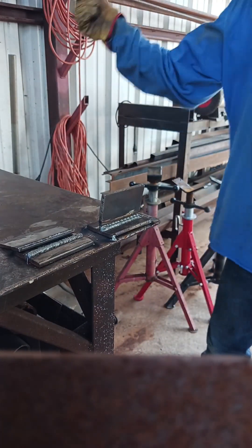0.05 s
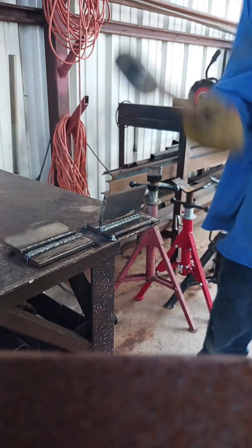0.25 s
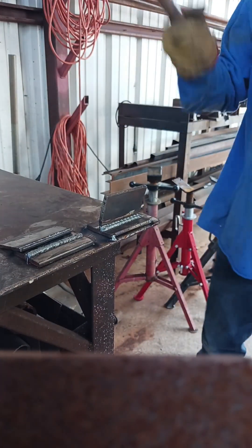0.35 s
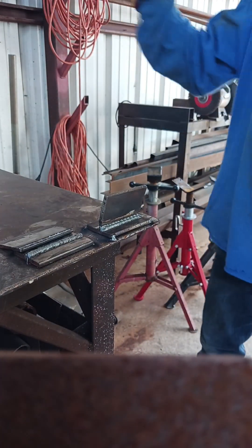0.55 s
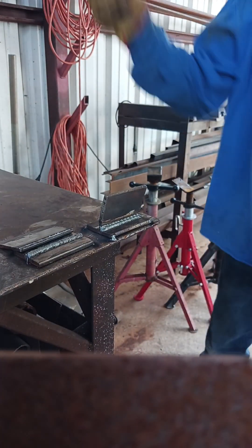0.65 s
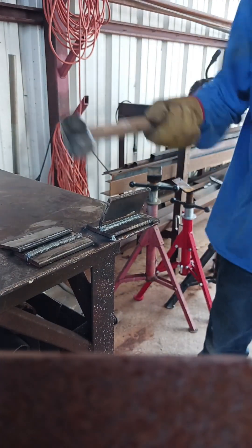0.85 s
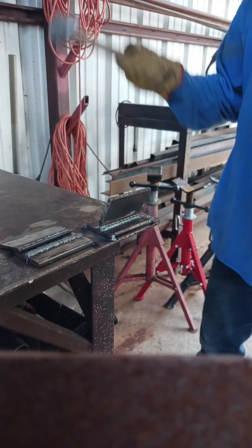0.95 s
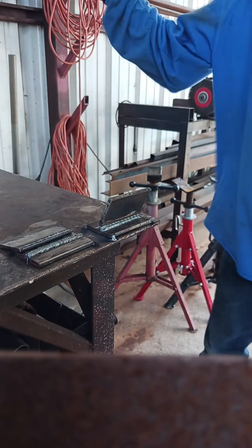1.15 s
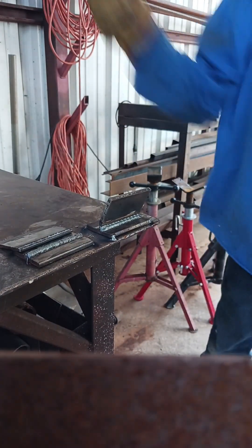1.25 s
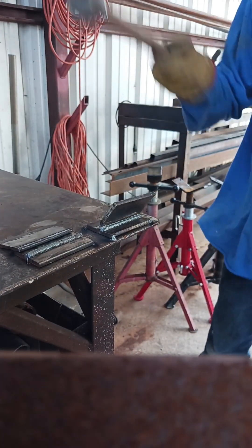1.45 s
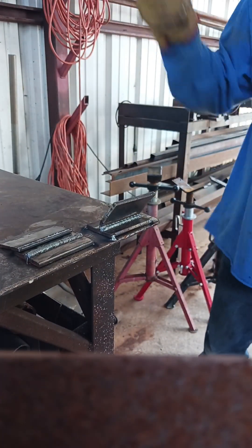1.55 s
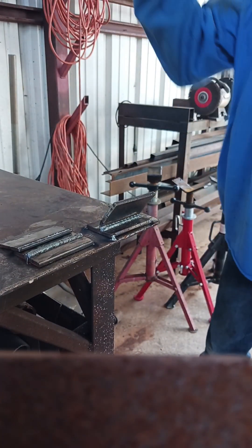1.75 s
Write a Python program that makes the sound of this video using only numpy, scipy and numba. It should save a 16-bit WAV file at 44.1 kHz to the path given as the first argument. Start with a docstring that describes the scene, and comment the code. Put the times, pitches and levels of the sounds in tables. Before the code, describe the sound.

Sledgehammer strikes a welded steel piece on a steel table, three loud cracking clangs in a metal shed

```python
"""In a sheet-metal shop a sledge strikes a welded steel coupon on a steel table, a metre or two from a phone.
Each blow is a crack shaped by broad plate resonances, with thin decaying rings and clatter; the shed is noise
that builds up and dies away. A loose steel bit, a few high decaying tones, chinks twice after one blow.
Filtered noise is the quiet shop air. The two microphone ports clip the loudest part and a limiter holds
the level down."""
import sys
import numpy as np
from scipy import signal
from scipy.fft import rfft, irfft, next_fast_len
from scipy.io import wavfile
from numba import njit

SR = 44100
rng = np.random.default_rng(int(sys.argv[2]) if len(sys.argv) > 2 else 0)


def gain_from_db(level_db):
    """Convert decibel levels to linear amplitude factors (20 dB per decade)."""
    decades = np.asarray(level_db, float) / 20
    return 10 ** decades


def inscribe(sig):
    """Save sig as 16-bit PCM at rate SR to the path in sys.argv[1].

    A 1-D sig is mono; a 2-D sig holds one channel per row.
    Samples are clipped to [-1, 1] before scaling.
    """
    pcm = np.round(np.clip(np.atleast_2d(sig).T, -1, 1) * 32767)
    wavfile.write(sys.argv[1], SR, pcm.astype(np.int16))


N = 79380  # length in samples: 1.8 s


def read_curve(table, hz):
    """Reads the second column of a table at any frequency, in straight lines over log frequency."""
    points = np.array(table)
    return np.interp(np.log(np.maximum(hz, 1)), np.log(points[:, 0]), points[:, 1])


# How alike the two ports hear the same noise. Each row: frequency in Hz, likeness from 0 to 1.
PORT_LIKENESS = [(60, 0.36), (130, 1), (300, 0.7), (640, 0.52), (1400, .02), (7000, 0.17), (15000, 0.67)]


def stereo_noise(size):
    """Spectra of left and right noise: a shared and an opposed part, mixed by how alike the ports are."""
    like = np.clip(read_curve(PORT_LIKENESS, np.fft.rfftfreq(size, 1 / SR)), 0, 1)
    shared, opposed = rfft(rng.standard_normal((2, size)))
    opposed = opposed * np.array([[1], [-1]])
    return (shared * np.sqrt(1 + like) + opposed * np.sqrt(1 - like)) / np.sqrt(2)


# Tone colour of the shop air. Each row: frequency in Hz, relative level in dB.
AIR_COLOUR = [(30, 3), (120, 10), (400, 11.5), (1400, -7), (4000, -19), (8000, -40.5), (16000, -59)]
AIR_DB = -74  # loudness ahead of the microphone


def shop_air():
    """Steady rumble and hiss: noise filtered so that it falls off towards the treble."""
    colour = gain_from_db(read_curve(AIR_COLOUR, np.fft.rfftfreq(N, 1 / SR)))
    air = irfft(stereo_noise(N) * colour, N)
    return air * gain_from_db(AIR_DB) / air.std()


# How long the shed rings on. Each row: frequency in Hz, time to fall by 60 dB in seconds.
SHED_T60 = [(60, 1.58), (200, .9), (600, 0.6884), (1500, 0.5719), (4000, 0.5453), (8000, 0.4739),
            (16000, 0.2625)]
SHED_SIZE, SHED_BUILD_S = 52000, 0.02  # length in samples, build-up time in seconds
DIRECT_DB, DIRECT_S = 1.5, 0.0049  # direct burst: level in the treble, decay time constant
DIRECT_FROM_HZ = 3000  # the direct burst is thin: the bass arrives by the walls


def shed():
    """Stereo response: a quick direct burst, then noise that builds up and dies away band by band."""
    t, hz = np.arange(SHED_SIZE) / SR, np.fft.rfftfreq(SHED_SIZE, 1 / SR)
    noise = stereo_noise(SHED_SIZE)
    response = 0
    octave = np.log2(np.maximum(hz, 1))
    for centre in np.arange(5, 14.5, .5):  # half-octave steps, as powers of two in Hz
        centre_hz = 2 ** centre
        band = np.cos(np.pi * np.clip(octave - centre, -.5, .5)) ** 2
        decay = np.exp(-np.log(1000) * t / read_curve(SHED_T60, centre_hz))
        build_up = 1 - np.exp(-t / SHED_BUILD_S)
        direct = gain_from_db(DIRECT_DB) * np.exp(-t / DIRECT_S) / (1 + (DIRECT_FROM_HZ / centre_hz) ** 2)
        response = response + irfft(noise * band, SHED_SIZE) * decay * (build_up + direct)
    return response


def ring(modes, scatter, since):
    """Struck metal: decaying sines of given Hz, dB and T60 in seconds, silent before the hit."""
    hz, db, t60 = (column[:, None] for column in np.array(modes).T)
    on = since[since >= 0]
    decay = np.exp(-np.log(1000) * on / t60)
    tone = gain_from_db(db + scatter[:, None]) * decay * np.sin(2 * np.pi * hz * on)
    return np.concatenate([np.zeros(len(since) - len(on)), tone.sum(axis=0)])


def pan(db):
    """Left and right gains for a sound that is louder on the left by this many dB."""
    return gain_from_db(np.array([[db], [-db]]) / 2)


# The loose bit lands. Each row: start in seconds, level in dB, brightness in dB per octave.
CHINKS = [(0.294, -24, -5), (0.335, -21, 0)]
# Tones of the bit, lowest first. Each row: level in dB, time to fall by 60 dB in seconds.
BIT_TONES = [(-2.5, 0.16), (-15, .2), (-6.5, 0.17), (-14.5, 0.22)]
# Pitches of those tones, in the same order, in Hz.
BIT_HZ = (8190, 9830, 12317, 14479)
BIT_SCATTER_DB = 3.5  # random spread of each tone
BIT_PAN_DB, BIT_ROOM_DB = 13.5, -12  # left over right; setting of its share through the shed


def loose_bit(room, size, lead):
    """A small steel piece bounces twice near the left port: a few high tones ring at each landing."""
    t = (np.arange(size) - lead) / SR
    scatter = BIT_SCATTER_DB * rng.standard_normal((len(CHINKS), len(BIT_TONES)))
    octaves = np.log2(np.array(BIT_HZ) / np.mean(BIT_HZ))
    modes = [(hz, *row) for hz, row in zip(BIT_HZ, BIT_TONES)]
    chinks = 0
    for (start, db, tilt_db), spread in zip(CHINKS, scatter):
        chinks = chinks + gain_from_db(db) * ring(modes, spread + tilt_db * octaves, t - start)
    in_shed = irfft(rfft(chinks) * room, size) / 20
    return chinks * pan(BIT_PAN_DB) + gain_from_db(BIT_ROOM_DB) * in_shed


def resonance(hz, centre_hz, width_hz):
    """Response of one broad plate resonance, 1 at the centre."""
    return 1j * hz * width_hz / (centre_hz ** 2 - hz ** 2 + 1j * hz * width_hz)


# Tone colour of the blow. Each row: frequency in Hz, level in dB.
BLOW_COLOUR = [(40, -40.5), (120, -30), (300, -28), (700, -15.5), (1500, -1.5), (4000, -2), (7000, -3),
               (9500, -14.5), (12500, -6), (16000, -15)]
TABLE_HZ, TABLE_WIDTH_HZ, FLANGE_HZ, FLANGE_WIDTH_HZ = 1450, 700, 2200, 400
COUPON_DB, COUPON_WIDTH_HZ, CRACK_DB = 2, 500, -7.5


def blow_body(hz, table_db, flange_db, coupon_hz, size):
    """Spectrum of crack, table, flange and coupon, their powers added, with the energy as early as can be."""
    table = gain_from_db(table_db) * resonance(hz, TABLE_HZ, TABLE_WIDTH_HZ)
    flange = gain_from_db(flange_db) * resonance(hz, FLANGE_HZ, FLANGE_WIDTH_HZ)
    coupon = gain_from_db(COUPON_DB) * resonance(hz, coupon_hz, COUPON_WIDTH_HZ)
    power = gain_from_db(CRACK_DB) ** 2 + abs(table) ** 2 + abs(flange) ** 2 + abs(coupon) ** 2
    log_gain = np.log(np.sqrt(power) * gain_from_db(read_curve(BLOW_COLOUR, hz)))
    cepstrum = irfft(log_gain, size)
    cepstrum[1:size // 2] *= 2  # folding the cepstrum gives minimum phase
    cepstrum[size // 2 + 1:] = 0
    return np.exp(rfft(cepstrum))


CLATTER_COUNT, CLATTER_S = 24, .07  # hits per blow, time they spread over in seconds
CLATTER_DB, CLATTER_SCATTER_DB = -18.5, 3  # least level (nearly) against the blow, spread above it


def blow_and_clatter(when, big, size):
    """Things on the table jump and clatter: weaker hits at random moments after the blow itself."""
    taps = np.zeros(size)
    hit_db = CLATTER_DB - CLATTER_SCATTER_DB * np.log(big + 0.00033) / 2
    taps[(when * CLATTER_S * SR).astype(int)] = gain_from_db(hit_db)
    taps[0] = 1  # the blow
    return taps * (-1.) ** np.arange(size)  # every other sample is turned over, so hits push either way


# The hammer head sings on. Each row: level in dB, time to fall by 60 dB in seconds.
HEAD_TONES = [(-60, 1.3), (-62, 1.4)]
# Pitches of the hammer head's tones, in the same order, in Hz.
HEAD_HZ = (12315, 12720)
CLANG_DB, CLANG_T60_S = -14, .04  # the coupon's short clang
STRAIGHT_PAN_DB = 6  # left over right, for clang and hammer head


def straight_ring(coupon_hz, since):
    """The hammer head's long thin tones and the coupon's short clang, heard without the shed."""
    modes = [(hz, *row) for hz, row in zip(HEAD_HZ, HEAD_TONES)]
    modes = modes + [(coupon_hz, CLANG_DB, CLANG_T60_S)]
    return ring(modes, np.zeros(len(modes)), since)


# The blows; the first falls just before the start. Each row: start in seconds, strength in dB,
# table body in dB, flange in dB, coupon pitch in Hz.
BLOWS = [(-.3, -7, 10, -21, 5520), (0.2155, 2.5, 5.5, -10.5, 4715), (.7655, 3, 1, -5.5, 3703),
         (1.3404, 2.5, -1, 0, 3720)]
# Thin rings of table and coupon. Each row: frequency in Hz, relative level in dB,
# time to fall by 60 dB in seconds.
RINGS = [(1164, -42, .35), (1541, -46, .35), (3760, -46, .35)]
RING_SCATTER_DB = 3  # random spread of each ring


def blows(room, size, lead):
    """Sledge on steel: body, clatter and thin rings go through the shed, the clang and the head do not."""
    hz, t = np.fft.rfftfreq(size, 1 / SR), (np.arange(size) - lead) / SR
    scatter = RING_SCATTER_DB * rng.standard_normal((len(BLOWS), len(RINGS)))
    chance = rng.random((len(BLOWS), 2, CLATTER_COUNT))
    into_shed, straight = 0, 0
    for (start, db, table_db, flange_db, coupon_hz), spread, (when, big) in zip(BLOWS, scatter, chance):
        delay = np.exp(-2j * np.pi * hz * (start + lead / SR))
        body = blow_body(hz, table_db, flange_db, coupon_hz, size) * delay
        hits = body * rfft(blow_and_clatter(when, big, size))
        rings = rfft(ring(RINGS, spread, t - start)) / 20
        into_shed = into_shed + gain_from_db(db) * (hits + rings)
        straight = straight + gain_from_db(db) * straight_ring(coupon_hz, t - start)
    return irfft(into_shed * room, size) + straight * pan(STRAIGHT_PAN_DB)


def scene():
    """Blows and the loose bit in the shed, over the shop air."""
    lead = SR // 2  # half a second of run-up, for the blow before the start
    size = 2 * next_fast_len((N + lead + SHED_SIZE) // 2)
    room = rfft(shed(), size)
    metal = blows(room, size, lead) + loose_bit(room, size, lead)
    return metal[:, lead:lead + N] + shop_air()


# Loudest level each port can take: left, then right, in dB.
PORT_CEILING_DB = (-7, -11)
# Lopsidedness of the ceilings, left then right, as a fraction.
CEILING_SKEW = (.08, .03)
# Level of the clipped-off part. Each row: frequency in Hz, level in dB.
CRACKLE_COLOUR = [(40, 7), (150, 4.5), (400, 3), (900, 9), (2000, -22), (6000, -5), (16000, 4.5)]
# Tone colour after the overload. Each row: frequency in Hz, level in dB.
MIC_COLOUR = [(40, 11.5), (150, 10.5), (500, 7), (1500, -3), (5000, -4), (10000, 0), (16000, 0)]
# Balance of the ports. Each row: frequency in Hz, left over right in dB.
LEFT_OVER_RIGHT = [(60, 1.5), (300, -5.5), (1300, -10), (2400, -1.5), (4400, -5), (8000, 6.5), (15000, 1)]


def microphone_ports(dry):
    """The ports clip hard and the stereo processing lifts the bass of that crackle; then tone colour."""
    top, skew = gain_from_db(np.array(PORT_CEILING_DB))[:, None], np.array(CEILING_SKEW)[:, None]
    crackle = np.clip(dry, -top * (1 - skew), top * (1 + skew)) - dry
    hz = np.fft.rfftfreq(N, 1 / SR)
    lean = read_curve(LEFT_OVER_RIGHT, hz) / 2
    colour = gain_from_db(read_curve(MIC_COLOUR, hz) + np.array([lean, -lean]))
    overloaded = rfft(dry) + rfft(crackle) * gain_from_db(read_curve(CRACKLE_COLOUR, hz))
    ports = irfft(overloaded * colour, N)
    return signal.sosfilt(signal.butter(2, 45, "high", fs=SR, output="sos"), ports)


@njit
def limiter(x, top, attack, release, ratio):
    """One gain for both channels, turned down as the envelope of the louder one passes the threshold."""
    y, envelope = np.empty_like(x), 0.
    for i in range(x.shape[1]):
        peak = max(abs(x[0, i]), abs(x[1, i]))
        envelope += (peak - envelope) * (attack if peak > envelope else release)
        y[:, i] = x[:, i] * (top / max(envelope, top)) ** (1 - 1 / ratio)
    return y


def top_cut(x):
    """Nothing passes above the cut-off."""
    return signal.sosfilt(signal.butter(12, 17030, fs=SR, output="sos"), x)


LIMIT_DB, RATIO, OUT_DB = -2.5, 6.8, 1.5  # threshold, compression ratio, gain after the limiter
ATTACK_S, RELEASE_S = .003, .045
TOP_HZ = 16050  # from here up the treble is held 24 dB down


def record(dry):
    """Overloading ports, limiter, output gain and a steep treble cut."""
    ports = microphone_ports(dry)
    attack, release = 1 / (1 + ATTACK_S * SR), 1 / (1 + RELEASE_S * SR)
    held = limiter(ports, float(gain_from_db(LIMIT_DB)), attack, release, RATIO)
    treble_cut = signal.cheby2(10, 24, TOP_HZ, fs=SR, output="sos")
    mix = signal.sosfilt(treble_cut, held * gain_from_db(OUT_DB))
    return top_cut(np.clip(mix, -1, 1))


dry = scene()
out = record(dry)
inscribe(out)
```